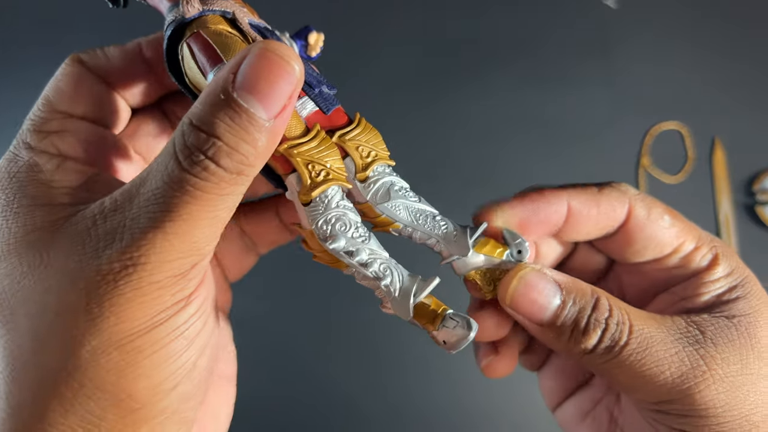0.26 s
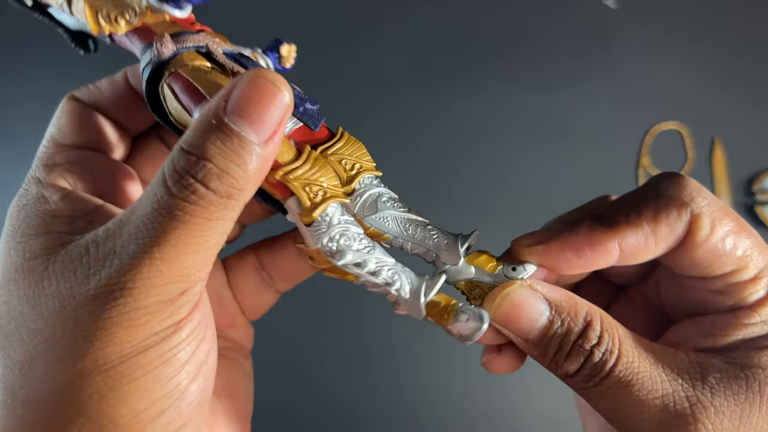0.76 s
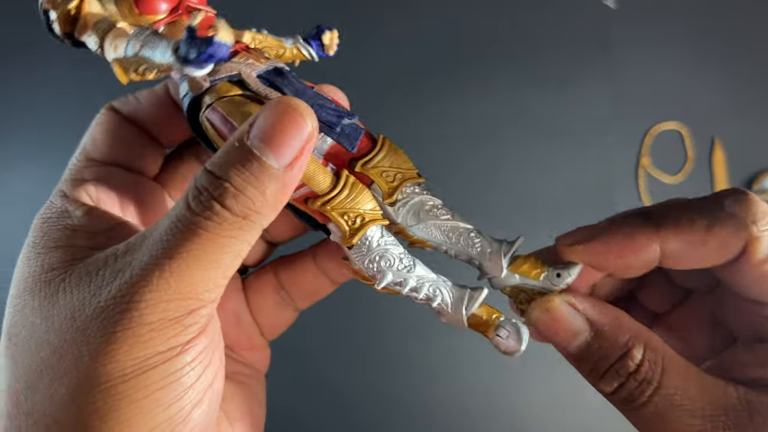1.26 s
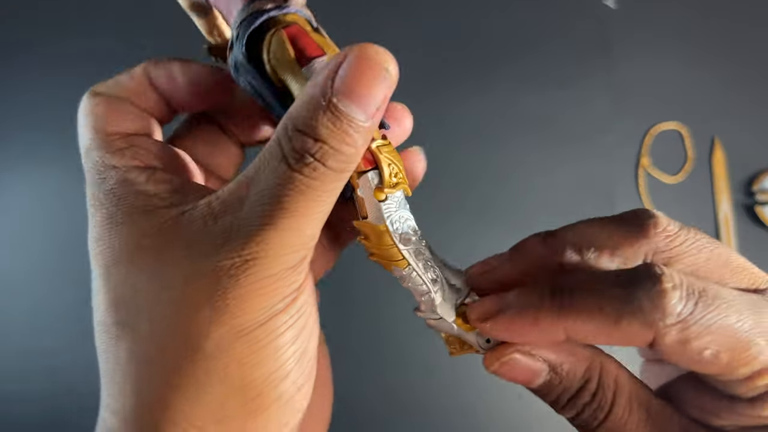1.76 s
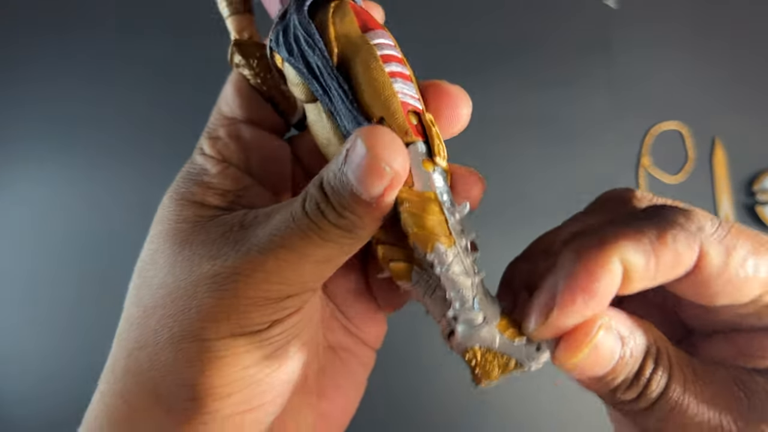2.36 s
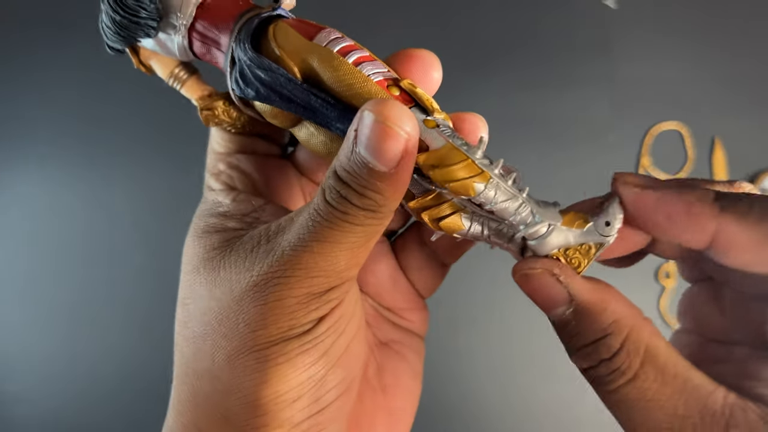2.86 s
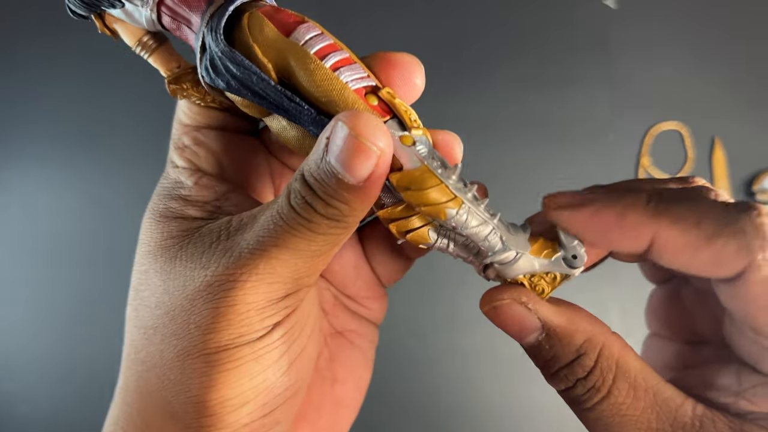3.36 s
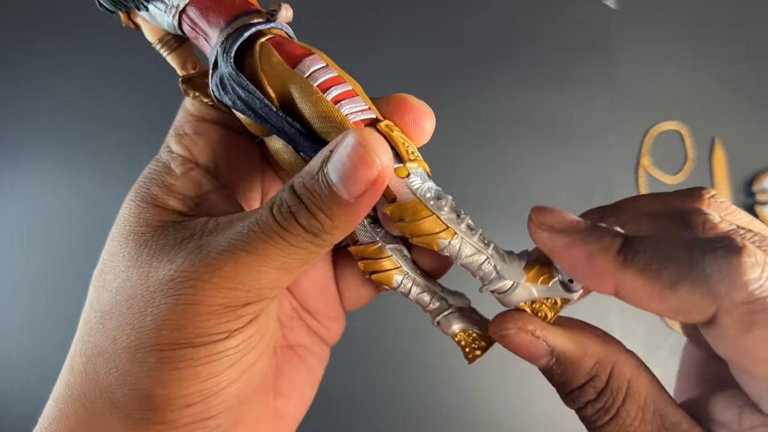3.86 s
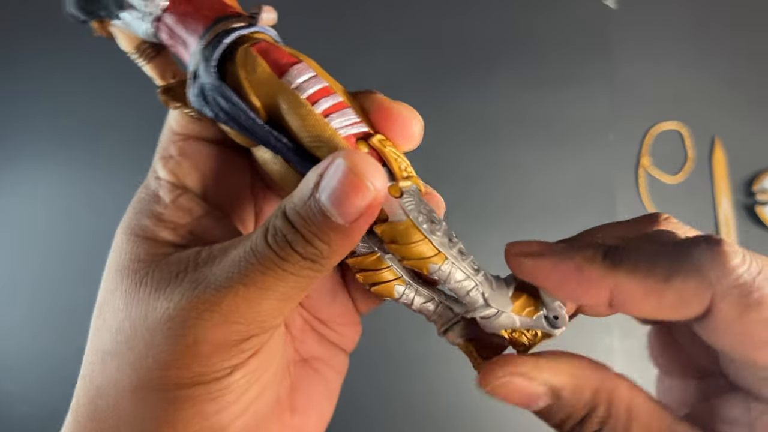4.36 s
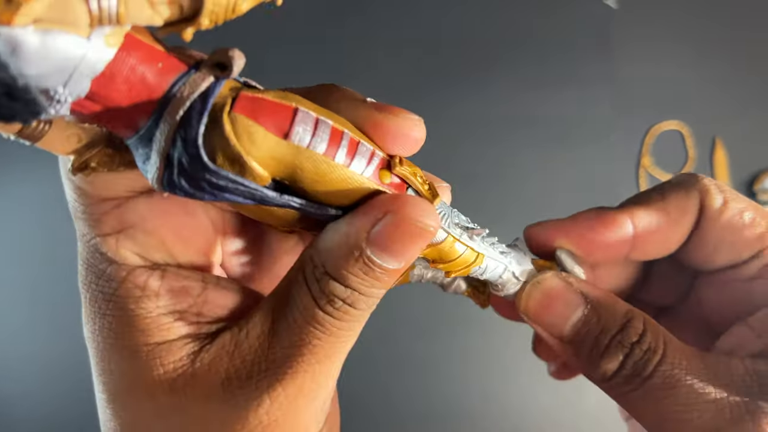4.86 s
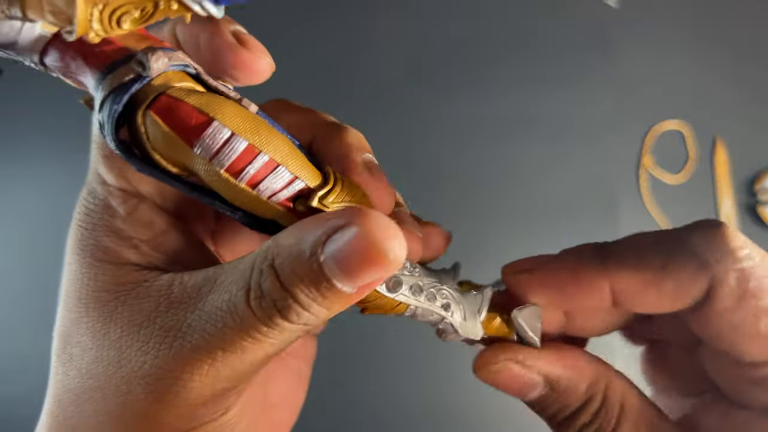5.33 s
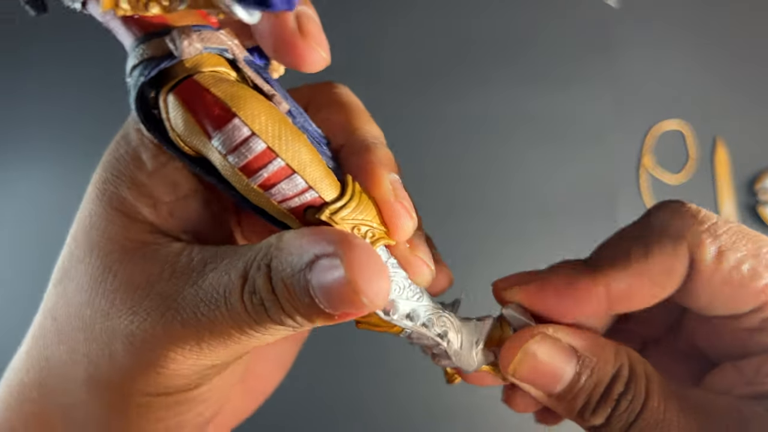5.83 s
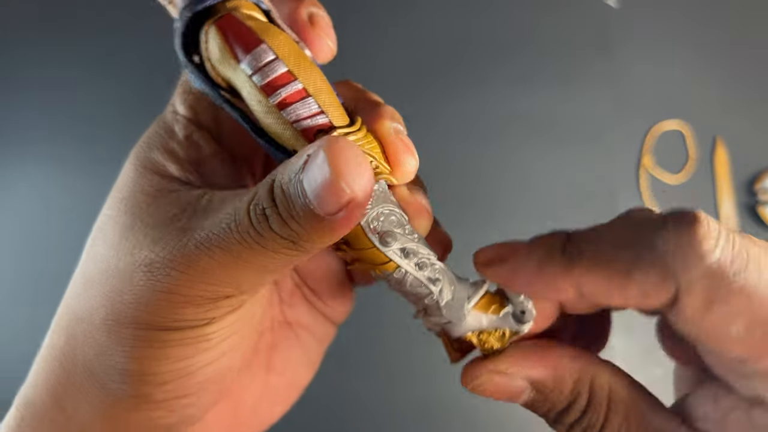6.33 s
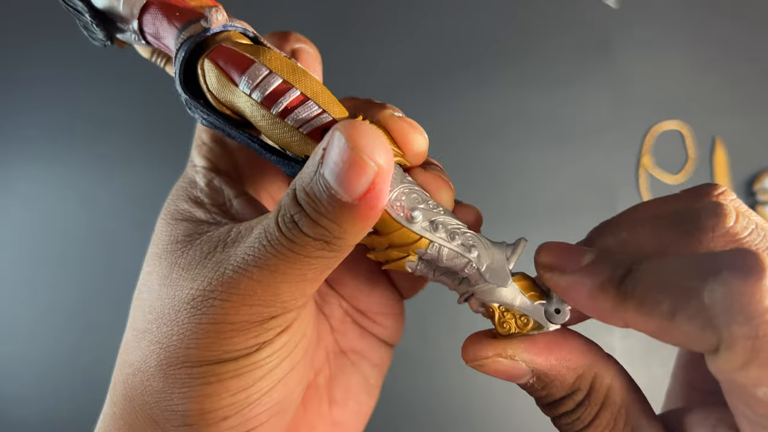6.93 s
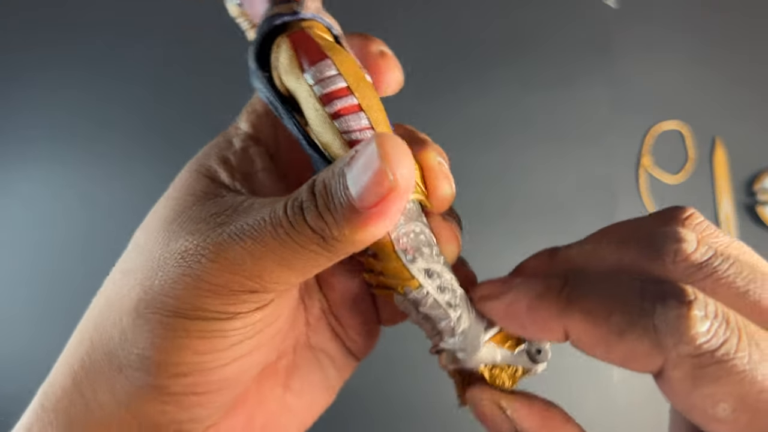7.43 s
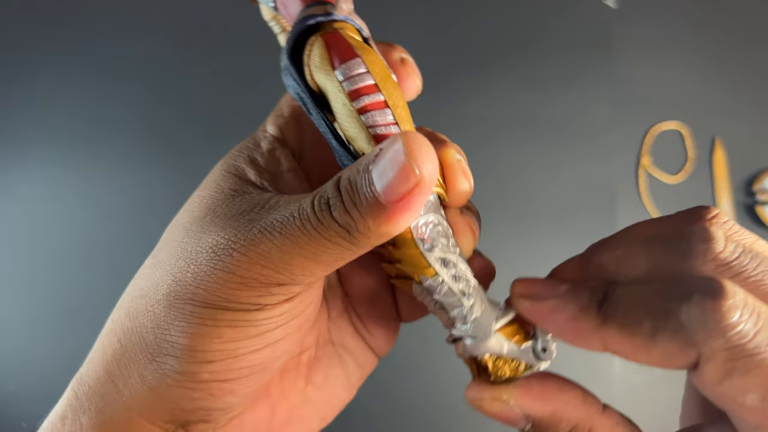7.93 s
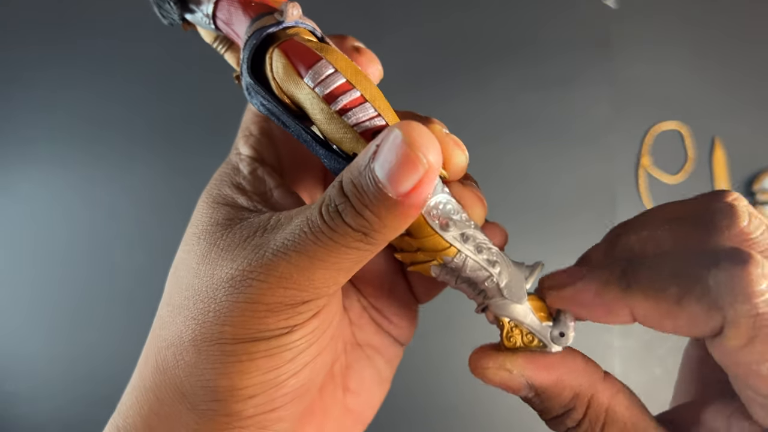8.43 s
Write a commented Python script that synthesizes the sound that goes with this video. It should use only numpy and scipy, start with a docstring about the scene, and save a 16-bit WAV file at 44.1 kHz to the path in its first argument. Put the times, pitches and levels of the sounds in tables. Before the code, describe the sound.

Fingers turn the ankle joints of a plastic action figure close to the microphone in a small room. The joints give irregular tiny ticks and a few sharper, bright snaps, with faint scrapes of skin on ribbed plastic. In the middle stretch, several dull thuds come from elsewhere in the building. The clicking carries on to the end over a steady low ventilation drone and soft hiss.

```python
"""A small room, a phone's two microphones a hand's width from a plastic toy figure.
Fingers turn its ankle joints: each one slips with a snap or a tick that rings the plastic parts
and scatters off hands and table. Skin sticks and slips over the ribs in a faint rub and quick scrapes.
Farther off, dull thuds come through the building, over the low drone of an air handler,
a thin hum and a soft room hiss."""
import sys
import numpy as np
from scipy import signal
from scipy.fft import rfft, irfft
from scipy.io import wavfile
from scipy.ndimage import uniform_filter1d

SR = 44100
rng = np.random.default_rng(int(sys.argv[2]) if len(sys.argv) > 2 else 0)


def file_out(sig):
    """Save sig as 16-bit WAV at sys.argv[1]."""
    # one column per channel
    cols = np.atleast_2d(sig).T
    # limit, then scale
    lim = np.clip(cols, -1, 1)
    pcm = np.round(lim * 32767).astype(np.int16)
    wavfile.write(sys.argv[1], SR, pcm)


N = 383229

# Joint snaps, a hand's width away. Each row: time in seconds, level of the tip's ring in dB, then,
# with levels relative to it, limb in dB, knock in dB, knock pitch in Hz, snap in dB, snap pitch in Hz,
# plate in dB, rim in dB, burst width in ms, echo gain in dB.
JOINT_SNAPS = [(0.437, -68.5, 3, -11, 2320, -13, 4300, -19, -14, 0.35, 8),
               (0.602, -65, -3.5, -12, 2140, 3, 4300, -3, -10, 0.4, -7),
               (0.607, -30.5, -11.5, -34, 2190, -10.5, 4270, -13, -13.5, 0.38, -1),
               (0.6934, -71, 10, -1, 2800, -4, 3810, 8, -8, 0.34, -3),
               (1.375, -73.5, -1, -4, 2200, -4, 5400, 17.5, -11, 0.52, -2),
               (1.393, -75, 12, 1, 2120, -4, 4290, 6, -11, 0.4, -3),
               (1.4158, -67, 6, -13, 2130, -5, 4100, -9, -23, 0.4, -4),
               (1.4576, -82, -5, -7, 2100, 20, 3970, -12, -15, 0.35, -3),
               (1.5253, -59.5, -22, -8, 2990, -5.5, 4480, -5, -20, 0.4, -1.5),
               (1.5985, -61.5, -12, -4, 2300, -3, 5050, -9, -21, 0.4, -1),
               (1.675, -74, -16, 11, 2970, -12, 4350, -1, -11, 0.4, 8.5),
               (1.8168, -62, -20, -21, 2210, -26, 3800, -17, -17, 0.4, 0),
               (1.825, -48.5, -5, -24, 2460, -23, 4470, -6.5, -15, 0.44, -5),
               (1.843, -65, -6, 0, 2470, -1, 4010, -19, -15, 0.4, 3),
               (1.9525, -57, -9, -20, 2440, -19, 5140, -18, -6, 0.35, 8),
               (2.067, -63, 2, -11, 3030, -15, 3890, -18, 1, 0.4, 4),
               (2.0783, -59, -12, -12, 2500, -25, 4140, -27, -9, 0.4, 0),
               (2.1216, -62.5, -13, -4, 2450, 1, 4970, -15, 1.5, 0.4, -1),
               (2.182, -64.5, -2, -10, 2250, -6, 4370, -3, -3, 0.45, 1),
               (2.2073, -49, -19, -24, 2490, -24, 4430, -18, -9, 0.4, 5),
               (2.2107, -30.5, -18, -13, 2680, -11.5, 4450, -19, -12.5, 0.54, -4.5),
               (2.4288, -65.5, -4, -17, 2120, -3, 4130, -15, -3, 0.37, 4),
               (2.6655, -67, -17, 2, 2520, -23, 4200, -4, -13, 0.58, 5),
               (2.9383, -37.5, -11, -12.5, 2500, -15, 4400, -21, -25, 0.99, -0.5),
               (2.9764, -58, 5, -17, 2290, 0, 4500, -10, -16, 0.46, 2),
               (3.012, -55.5, 0.5, -3, 2700, 1, 4410, -10, -18, 0.26, -2),
               (3.044, -79.5, 20, 18, 2860, 2, 4580, -2, -8, 0.36, -2),
               (3.288, -61, -10, -8, 2260, -4, 4510, -8, -14, 0.58, 4.5),
               (3.3332, -77.5, 0, 22.5, 2460, -5, 4080, -1, -4, 0.26, -1.5),
               (3.3906, -70, -4, 7, 2720, -7, 5050, -11, -9, 0.33, 1),
               (3.4345, -52, -26, -10, 2600, 3.5, 4740, -21, -15, 0.38, -1.5),
               (3.44, -58, -3, 2.5, 2600, -12, 5190, -6, -7, 0.26, 1),
               (3.497, -58, 9, -1, 2750, -1, 4280, -5, -12, 0.61, -1),
               (3.52, -77, 10, 4, 2440, 6, 4650, 14, -7, 0.4, -3),
               (3.673, -81.5, 10, 18, 2450, 6, 4980, -4, -4, 0.4, 5),
               (3.7064, -66.5, 12, 23.5, 2540, 1, 4450, 5, -8, 0.54, -1.5),
               (3.82, -88.5, -3, 27, 2800, 0, 4950, 0, -4, 0.4, 0),
               (4.141, -75, -3, 13.5, 2650, -6, 3910, -14, -11, 0.4, 5.5),
               (4.2876, -64.5, -10, 0, 2610, -16, 3920, -12, -7, 0.48, 4.5),
               (4.562, -70, 10, 14.5, 2350, -21, 4960, -23, -7, 0.4, 0),
               (5.1016, -67.5, -10, 7, 2500, 7.5, 5570, -3, -13.5, 0.51, 0.5),
               (5.132, -59, -21, 2, 2400, -22, 4290, -5, -19, 0.58, 4),
               (5.171, -46.5, -27, -29, 2180, -14, 4570, -8, -27, 0.53, -5),
               (5.2822, -56, -18, 7, 2470, -8, 4570, -19, 1, 0.92, -0.5),
               (5.383, -62, -2, -28, 2120, -30, 4010, -29, -20, 0.9, 8),
               (5.463, -71.5, -8, -5, 2420, -15, 3900, 2, 4, 0.4, -2),
               (5.669, -73.5, -7, 3, 2920, -1, 3850, -19, -19, 0.4, 4),
               (6.564, -50.5, -16, -0.5, 2610, -3, 4500, -13.5, -25, 0.51, -1),
               (6.6513, -66.5, -20, 15, 2530, -10, 5240, -24, -18, 0.24, 0),
               (7.0296, -70, -8, 9, 2660, -12, 4230, -16, -18, 0.34, 3.5),
               (7.1474, -90, 7, 31, 2630, -4, 4190, -6, -1, 0.39, -1),
               (7.215, -75, 1, -11, 2480, -7, 3980, -13, -8, 0.4, -3),
               (7.3066, -56, -18, -7, 2520, -2, 3300, -4, -9, 0.28, -9),
               (7.4245, -58, -23, -26, 2310, -18, 3840, -18, -17, 0.4, 4),
               (7.4326, -28.5, -24, -22.5, 2780, -27, 5370, -17, -7.5, 0.32, -2.5),
               (7.6589, -86.5, 5, 30.5, 2760, -7, 4270, -18, -8, 0.4, -1.5),
               (7.8288, -66.5, -13, -13, 2240, -22, 3960, -25, -30, 0.4, -3),
               (8.0187, -57, -23, -13, 2780, -26, 4520, -25, -21, 0.27, -1),
               (8.1296, -58, 1, 5, 2380, -3.5, 4470, -5.5, -25, 0.31, -1),
               (8.502, -33.5, -43, -33, 2940, -35, 4500, -13, -13, 0.32, -6.5),
               (8.503, -52.5, -19, -3, 2850, 2, 4340, -19, -10, 0.72, 0),
               (8.6437, -38, -18.5, -20, 2300, -21.5, 3530, -25, -25, 1, 1.5)]


def joint_snaps(rows):
    """A joint creeps, breaks free and splinters into tiny slips that ring the parts of the figure."""
    out, n = np.zeros((N, 2)), 500
    creep_ms, firm_db = 1.6, -47.5
    after_ms = np.arange(n) * 1000 / SR - creep_ms  # time since the break
    crack = 1. * (np.arange(n) == np.abs(after_ms).argmin())
    creep = 0.017 * (after_ms < 0)
    after_slips = 0.23 * (after_ms > 0) * np.exp(-np.abs(after_ms) / 1.8)
    for row in rows:
        s, db, limb_db, knock_db, knock_hz, snap_db, snap_hz, plate_db, rim_db, burst_ms, echo_db = row
        burst = 1.17 * np.exp(-((after_ms - burst_ms) / max(burst_ms, .05)) ** 2)
        force = 9.5 * crack + rng.standard_normal(n) * (creep + burst + after_slips)
        shares_db = (0, rim_db, plate_db, snap_db, knock_db, limb_db)
        # heard from all sides at once, knock and snap spread wider than in the direct sound
        all_round = plastic_parts(crack, knock_hz, snap_hz, shares_db, blur=2.9)
        scatter_db = -3 + 0.23 * (db - firm_db)  # harder snaps stir up more scatter
        heard = undb(echo_db) * near_echoes(all_round, scatter_db)
        heard[:, :n] += plastic_parts(force, knock_hz, snap_hz, shares_db, blur=0.57)
        add(out, s - creep_ms / 1000, undb(db) * heard.T)
    return out.T


# Resonances of the snapped figure, low to high. Each row: pitch in Hz, width in Hz, gain in dB.
LIMB_MODES = [(950, 400, 0), (1500, 250, 0.5), (1900, 940, -6)]
PLATE_MODES = [(3250, 500, -6), (5700, 600, -3.5), (7030, 1300, 10)]
RIM_MODES = [(7540, 350, -6), (8010, 230, 3.5), (8360, 430, 1.5), (9160, 300, 0)]
TIP_MODES = [(12170, 550, 0.5), (12300, 620, 0), (15100, 2000, 2.5)]


def plastic_parts(force, knock_hz, snap_hz, shares_db, blur):
    """The force rings tip, rim, plate, snap, knock and limb, each at its share of the energy."""
    # the small parts cannot radiate low notes
    tip = signal.sosfilt(signal.butter(4, 9500, "highpass", fs=SR, output="sos"), ring(force, TIP_MODES))
    rim = ring(ring(force, RIM_MODES), [(8200, 4500, 0)])
    plate = ring(ring(force, PLATE_MODES), [(5600, 8000, 0)])
    snap = ring(force, [(snap_hz, blur * 690, 0)])
    knock = ring(force, [(knock_hz, blur * 250, 0)])
    parts = tip, rim, plate, snap, knock, ring(force, LIMB_MODES)
    span_ms = 0.38  # a part's level is its energy spread over this span
    mix = sum(undb(db) * part / np.linalg.norm(part) for db, part in zip(shares_db, parts))
    return mix * np.sqrt(span_ms * SR / 1000)


def near_echoes(x, scatter_db):
    """Quick scatter off hands and table, then the room's short tail; the sides differ lower down."""
    n = int(.2 * SR)
    table_t60_s, room_t60_s, room_db = 0.032, 0.18, -2.5
    mid, side = signal.lfilter(*signal.butter(1, 9000, fs=SR), rng.standard_normal((2, n)))
    side = signal.lfilter(*signal.butter(2, 5500, fs=SR), side)
    scatter = fade(n, table_t60_s)
    tail = fade(n, room_t60_s) * (1 - fade(n, 0.014))
    decay = undb(scatter_db) * scatter / np.linalg.norm(scatter)
    decay += undb(room_db) * tail / np.linalg.norm(tail)
    echo = decay * (mid + 0.92 * side * np.array([[1], [-1]]))
    echo = signal.lfilter(*signal.butter(1, 2070, "highpass", fs=SR), echo)
    return signal.fftconvolve(echo, x[None], axes=1)


# Skin resting and creeping on the plastic. Each row: time in seconds, base level in dB.
SKIN_CREEP = [(0, -102), (.5, -93.5), (.9, -104), (1.4, -96), (2.2, -92.5), (2.9, -95.5), (3.15, -106),
              (3.5, -96), (3.9, -104), (4.4, -94), (4.9, -104), (5.3, -93), (5.7, -101), (6.2, -100),
              (6.6, -95), (6.9, -102), (7.4, -99), (7.9, -105), (8.69, -95.5)]
# Quick scrapes over the ribs. Each row: start in seconds, length in seconds, base level in dB,
# shell share in dB, body share in dB.
RIB_SCRAPES = [(0.413, 0.12, -100, 3, -5), (1.594, 0.017, -79, -4, 8), (1.646, 0.1, -85.5, -6, 3),
               (1.812, 0.027, -66.5, 2, -3), (1.867, 0.078, -79, -7, -9), (1.925, 0.13, -65.5, -9, -3.5),
               (2.04, 0.028, -73, -5, -5), (2.42, 0.06, -95, 7, -8), (2.684, 0.047, -96, 3, 5),
               (2.736, 0.1, -83, 2.5, -3), (2.864, 0.024, -94.5, -12, 18), (3.243, 0.25, -83.5, -15, -1),
               (4.255, 0.347, -100, 0, -1), (4.563, 0.049, -85.5, 1, 11.5), (4.65, 0.14, -88.5, -23, 6),
               (5.121, 0.077, -75, -4, -2), (5.128, 0.027, -72, 7.5, -11), (5.274, 0.029, -74.5, 3, 3),
               (5.355, 0.1, -91, 1, 6), (5.747, 0.05, -98, -22, 21), (5.815, 0.11, -91.5, -24, 17.5),
               (6.424, 0.14, -74.5, -17, -7), (6.557, 0.024, -68.5, -2, 3), (6.582, 0.058, -87, -21, 9),
               (7.011, 0.047, -85.5, 1, 13.5), (7.301, 0.014, -72, 0, 4), (7.368, 0.073, -78, -22, -14),
               (7.623, 0.091, -100, -8, 15), (8.011, 0.029, -81, 8, 4), (8.127, 0.017, -69, -4, 2)]
# Resonances of the rubbed figure, low to high. Each row: pitch in Hz, width in Hz, gain in dB.
BODY_MODES = [(1050, 500, -1), (1560, 288, 5.5), (2610, 701, 5.5)]
MIDDLE_MODES = [(4600, 2080, 2), (6600, 2400, -7.5)]
SHELL_MODES = [(8600, 670, -5.5), (11520, 1100, 0), (12700, 2473, 6.5), (14280, 723, -0.5)]


def skin_rub():
    """Dense stick-slip grains of uneven size: a faint creep all along, swelling in each scrape."""
    t = np.arange(N) / SR
    creep = undb(over_time(SKIN_CREEP))
    shell, middle, body = creep.copy(), creep.copy(), creep * undb(12)
    for start, length, db, shell_db, body_db in RIB_SCRAPES:
        progress = np.clip((t - start) / length, 0, 1)
        swell = undb(db) * np.sin(np.pi * progress).clip(0) ** 0.83
        shell += undb(shell_db) * swell
        middle += swell
        body += undb(body_db) * swell
    grains = rng.standard_normal((2, N)) * undb(1.8 * rng.exponential(size=N) + 2 * wander(110))
    # the duller part comes from all over the figure, so the two sides differ
    spread = grains[0] + 0.22 * grains[1] * np.array([[1], [-1]])
    return (shell * level(ring(grains[0], SHELL_MODES), 1.2)
            + middle * level(ring(grains[0], MIDDLE_MODES), -4.0)
            + body * level(ring(spread, BODY_MODES), -0.91))


def faint_ticks(count=16):
    """Snap rows for tiny ticks at chance moments, crowded where the skin creeps most."""
    crept = np.cumsum(undb(over_time(SKIN_CREEP)))
    when, size, dull, bright, tune = rng.random((count, 5)).T
    s = np.searchsorted(crept, when * crept[-1]) / SR + 0.0041
    db = -79.5 + 6 * (2 * size - 1)
    knock_db = 3.5 + 6 * (2 * dull - 1)
    snap_db = -16.5 + 9 * (2 * bright - 1)
    return list(zip(s, db, knock_db - 11, knock_db, 2100 + 800 * tune, snap_db, 4100 + 1200 * tune,
                    snap_db, snap_db - 1, 0.13 * size, np.zeros_like(s)))


# Thuds from elsewhere in the building. Each row: start in seconds, gain in dB, pitch in Hz,
# 60 dB decay in seconds, then, with levels relative to the bump, push in dB, rattle in dB,
# rattle top in Hz, rattle decay in seconds, hollow knock pitch in Hz, hollow knock in dB.
BUILDING_THUDS = [(2.325, -30.5, 125.5, 0.39, -13, -19, 354, 0.42, 1290, -29),
                  (2.865, -33, 97.5, 0.13, -2, -12.5, 566, 0.27, 950, -23),
                  (4.07, -40, 132, 0.31, -16, -17, 430, 0.42, 400, -26),
                  (4.657, -26, 80.5, 0.4, -0.5, -29.5, 1500, 0.87, 1010, -40),
                  (5.223, -28.5, 84, 0.12, -14, -34.5, 980, 0.23, 400, -40),
                  (5.522, -30, 94.7, 0.16, -20, -24.5, 980, 0.16, 540, -15),
                  (5.555, -35.5, 94, 0.056, -3, -9.5, 520, .11, 1540, -30),
                  (5.76, -45.5, 103, 0.11, 7.5, -11.5, 910, 0.24, 1500, -10),
                  (5.87, -29, 97, 0.1, -14, -22.5, 900, 0.13, 850, -30)]


def building_thuds():
    """A sinking low bump over a deep push of the floor, with a hollow knock and a diffuse rattle."""
    out, n = np.zeros((N, 2)), int(.5 * SR)
    t = np.arange(n) / SR
    push = np.sin(2 * np.pi * 45 * t) * fade(n, 0.37)
    attack = 1 - np.exp(-t / 0.0073)
    glide = t + 0.00754 * (1 - np.exp(-t / 0.0069))  # the bump starts about an octave high
    for s, db, hz, t60, push_db, rattle_db, top_hz, rattle_t60, hollow_hz, hollow_db in BUILDING_THUDS:
        bump = np.sin(2 * np.pi * hz * glide) * fade(n, t60)
        band = signal.butter(2, [217, top_hz], "bandpass", fs=SR, output="sos")
        rattle = level(signal.sosfilt(band, rng.standard_normal((2, n))), rattle_db) * fade(n, rattle_t60)
        hollow = undb(hollow_db) * np.sin(2 * np.pi * hollow_hz * t) * fade(n, 0.08)
        thud = (bump + undb(push_db) * push + hollow + rattle) * attack
        add(out, s, undb(db) * thud.T)
    return out.T


# The air handler as it fills the room. Each row: frequency in Hz, relative density in dB.
DRONE_SPECTRUM = [(20, -26.5), (32, -26.5), (50, -10), (62, -20), (81, 2.5), (95, 0), (108, -6),
                  (118, -6.5), (135, -4), (160, -19), (195, -16), (240, -26.5), (277, -24.5), (320, -33),
                  (420, -37), (600, -91.5)]


def air_handler():
    """A low drone of noise, almost steady in level."""
    return diffuse_noise(DRONE_SPECTRUM, db=-43) * undb(0.14 * wander(5.6))


# Wavering tones in the room air. Each row: pitch in Hz, width in Hz, level in dB.
HUM_TONES = [(754, 6.7, -84), (857.4, 22, -81.5), (2450, 110, -92)]


def room_hum():
    """Narrow bands of noise, different at the two microphones."""
    return sum(level(ring(rng.standard_normal((2, N)), [(hz, width, 0)]), db)
               for hz, width, db in HUM_TONES)


# Room tone all around the phone. Each row: frequency in Hz, relative density in dB.
HISS_SPECTRUM = [(250, -19), (380, -4.5), (460, -1), (640, -7.5), (737, -3), (790, -9.5), (846, -8),
                 (1170, -13.5), (2500, -20), (6500, -32), (9000, -38.5), (12000, -40.5), (13300, -41),
                 (14500, -54.5)]


def room_hiss():
    """Soft broad noise whose level drifts a little."""
    return diffuse_noise(HISS_SPECTRUM, db=-69) * undb(0.79 * wander(5))


# How alike steady sound is at the two microphones. Each row: frequency in Hz, correlation.
MIC_LIKENESS = [(30, 0.45), (70, 1), (130, 0.88), (280, 0.54), (600, -0.45), (1400, -0.061), (5000, 0.18),
                (8500, 0.73), (16000, 0.95)]


def diffuse_noise(spectrum, db):
    """Coloured noise whose two sides are more or less alike, depending on frequency."""
    alike = np.clip(over_frequency(MIC_LIKENESS), -1, 1)
    mid, side = rfft(rng.standard_normal((2, N))) * undb(over_frequency(spectrum))
    mid, side = mid * np.sqrt(1 + alike), side * np.sqrt(1 - alike)
    return level(irfft(np.array([mid + side, mid - side]), N), db)


# The phone's two microphones. Each row: frequency in Hz, phase lead of the left in radians,
# left minus right for the figure in dB.
MIC_PAIR = [(300, 0.89, 5), (2750, 0.99, 4.5), (4680, 1, 4), (6950, 1, 6)]


def microphones(pair, panned):
    """Each channel gets its own phase; above the crossover the left one simply arrives later."""
    crossover_hz, lag_s = 8550, 1 / 3500
    bins = np.arange(N // 2 + 1) * SR / N
    hz, lead, pan_db = np.transpose(MIC_PAIR + [(crossover_hz, 0, 0)])
    phase = np.interp(bins, hz, lead) - 2 * np.pi * lag_s * np.maximum(bins - crossover_hz, 0)
    left = np.exp(.5j * phase) * undb(panned * np.interp(bins, hz, pan_db) / 2)
    return irfft(rfft(pair) * np.array([left, 1 / left]), N)


def undb(db):
    return 10 ** (np.asarray(db) / 20)


def level(x, db):
    return x * undb(db) / np.sqrt(np.mean(x ** 2))


def over_time(table):
    """A table's points joined by straight lines, at every sample."""
    return np.interp(np.arange(N) / SR, *np.transpose(table))


def over_frequency(table):
    """A table's points joined on a log-frequency axis, at every transform bin."""
    hz, values = np.transpose(table)
    bins = np.arange(N // 2 + 1) * SR / N + 1
    return np.interp(np.log(bins), np.log(hz), values)


def ring(x, modes):
    """A sum of resonators driven by x."""
    return sum(undb(db) * signal.lfilter(*signal.iirpeak(min(hz, .45 * SR), hz / width, SR), x)
               for hz, width, db in modes)


def fade(length, t60):
    return np.exp(-np.log(1000) * np.arange(length) / (t60 * SR))


def add(track, s, sound):
    i = int(s * SR)
    track[i:i + len(sound)] += sound[:N - i]


def wander(rate_hz):
    """Random values held 1 / rate_hz seconds and smoothed twice."""
    hold = int(SR / rate_hz)
    steps = np.repeat(rng.standard_normal(N // hold + 1), hold)
    return uniform_filter1d(uniform_filter1d(steps, hold), hold)[:N]


def scene():
    """The figure close up and a little to the left, the building and the room behind it."""
    figure = microphones(joint_snaps(JOINT_SNAPS + faint_ticks()) + skin_rub(), panned=True)
    drone = air_handler()
    hiss = microphones(room_hiss(), panned=False)
    return figure + building_thuds() + room_hum() + drone + hiss


def record(dry):
    """The phone cuts the treble above 16.4 kHz."""
    return signal.sosfilt(signal.ellip(10, .2, 70, 16400, fs=SR, output="sos"), dry)


dry = scene()
out = record(dry)
file_out(out)
```